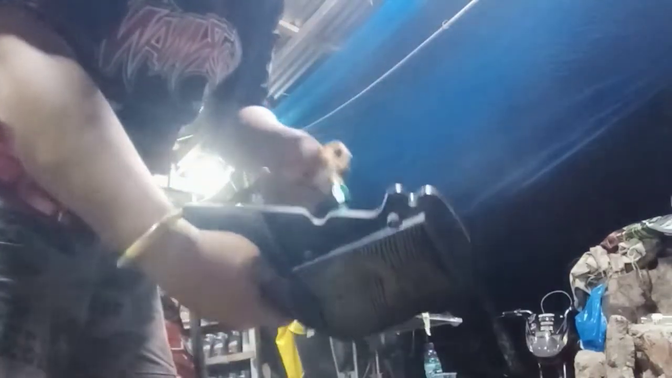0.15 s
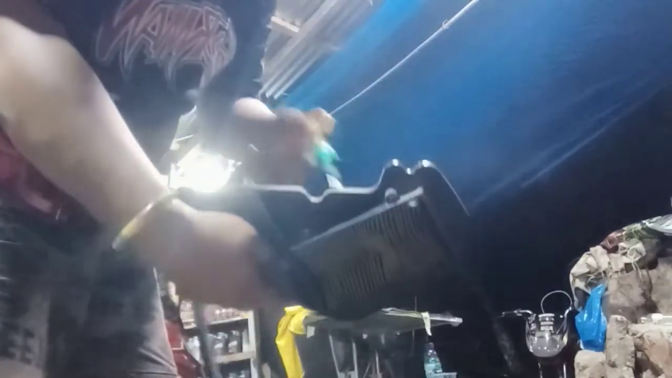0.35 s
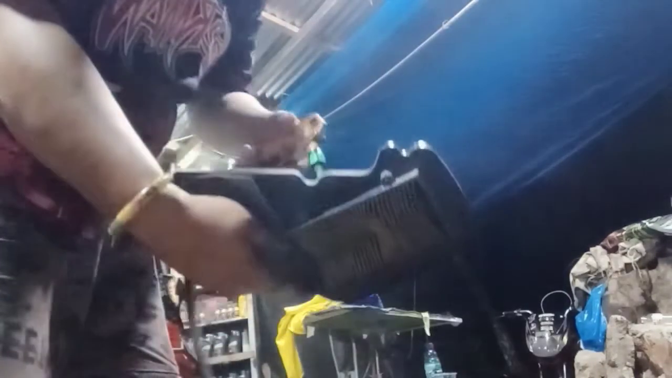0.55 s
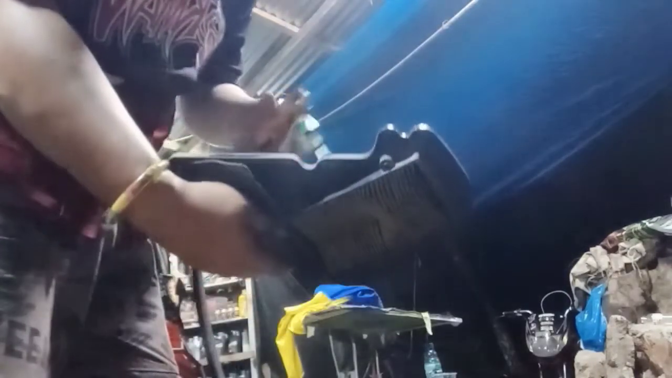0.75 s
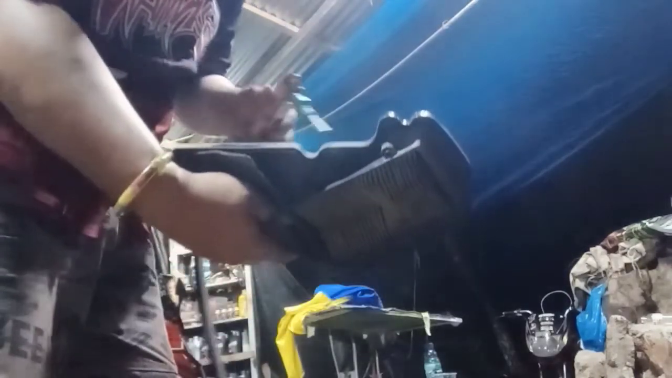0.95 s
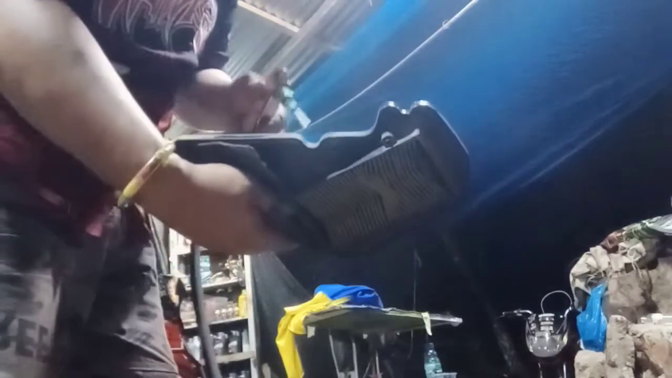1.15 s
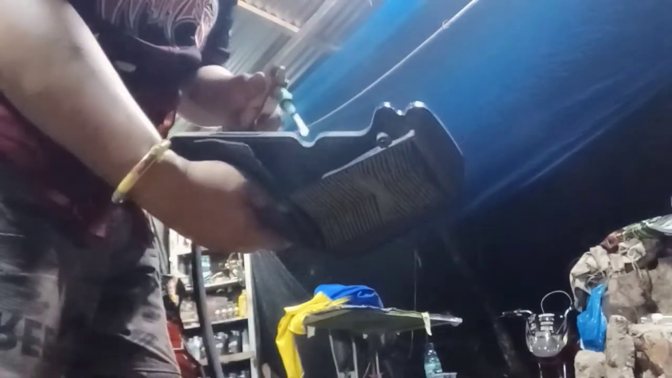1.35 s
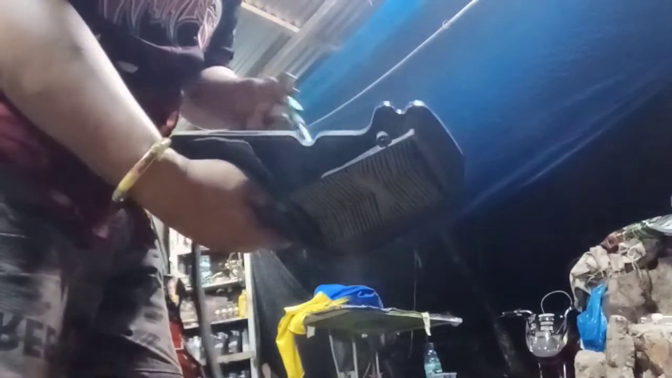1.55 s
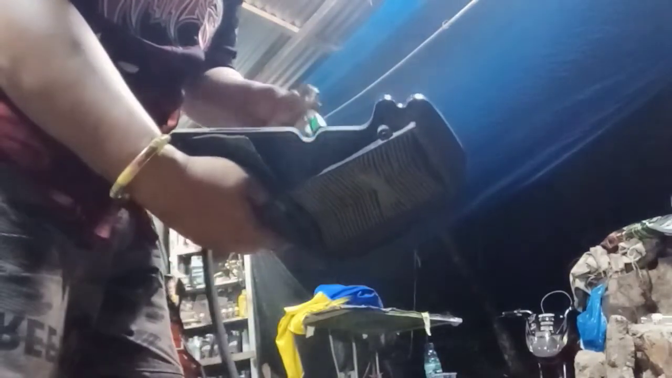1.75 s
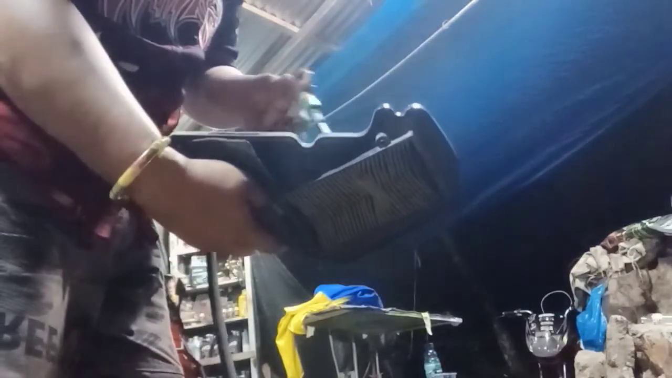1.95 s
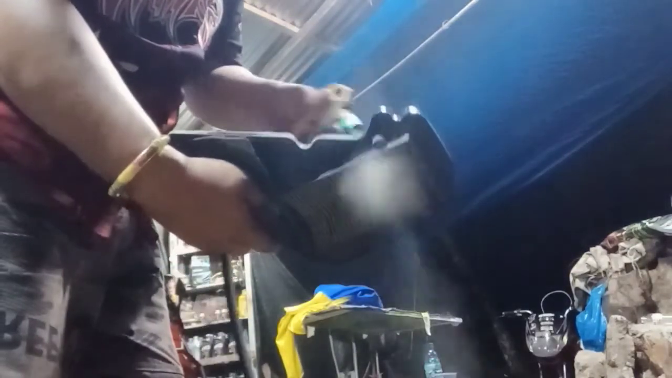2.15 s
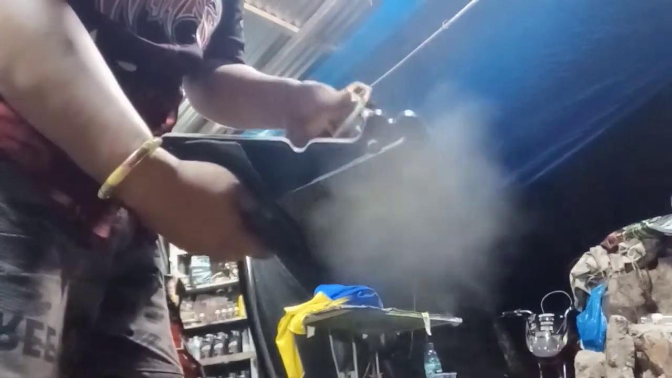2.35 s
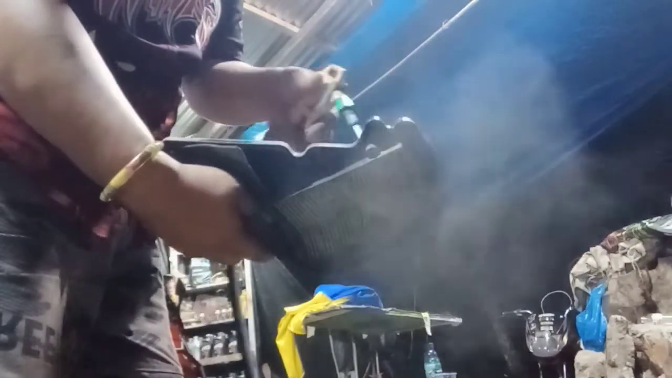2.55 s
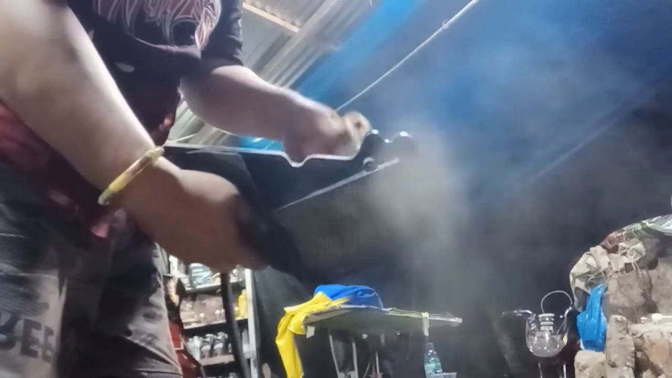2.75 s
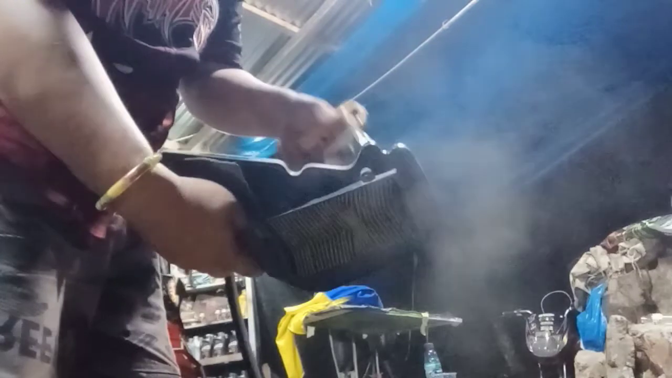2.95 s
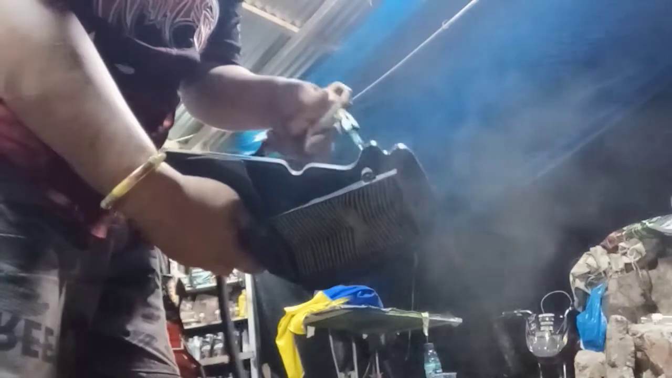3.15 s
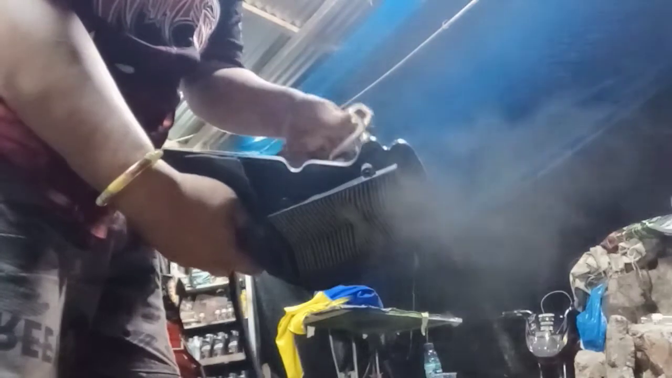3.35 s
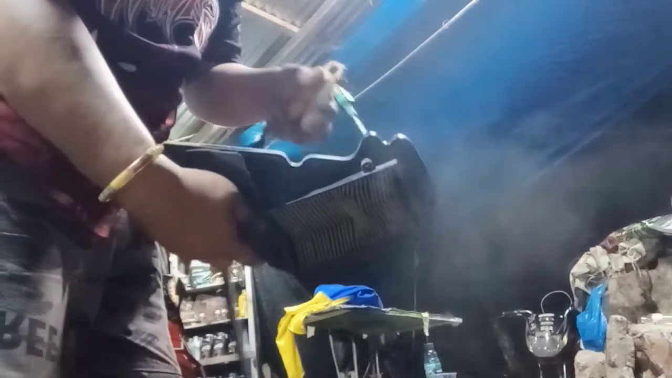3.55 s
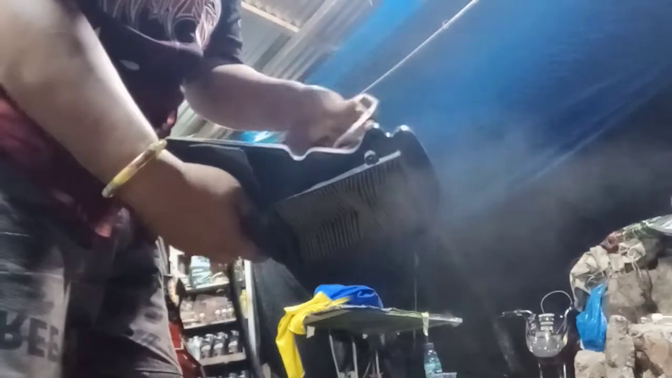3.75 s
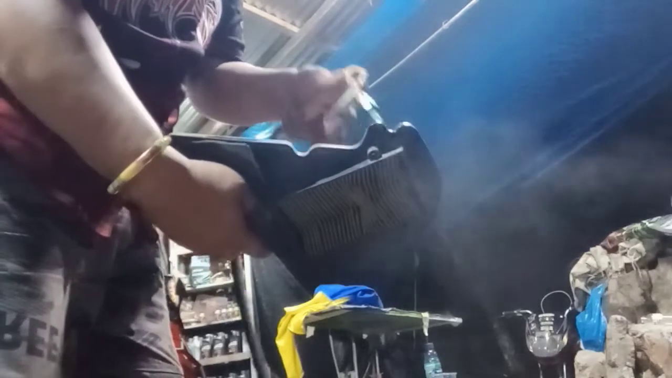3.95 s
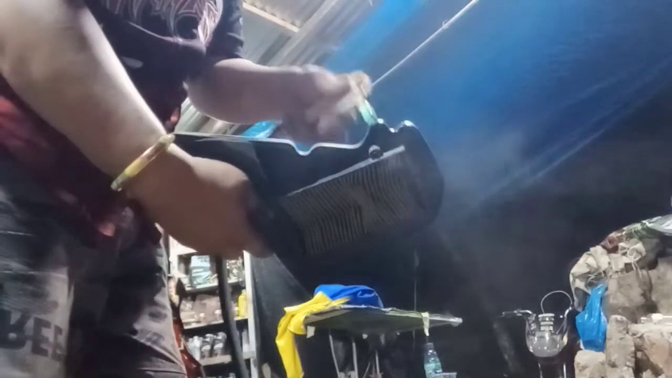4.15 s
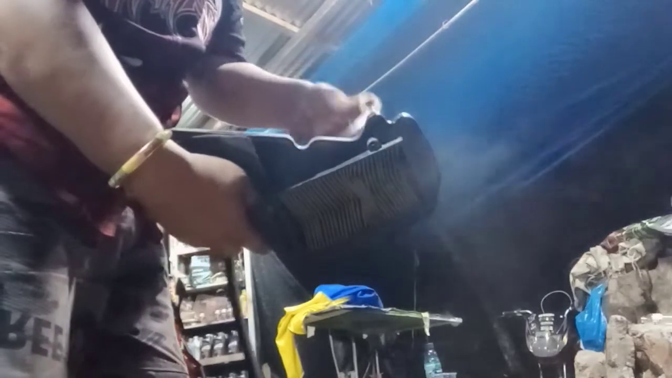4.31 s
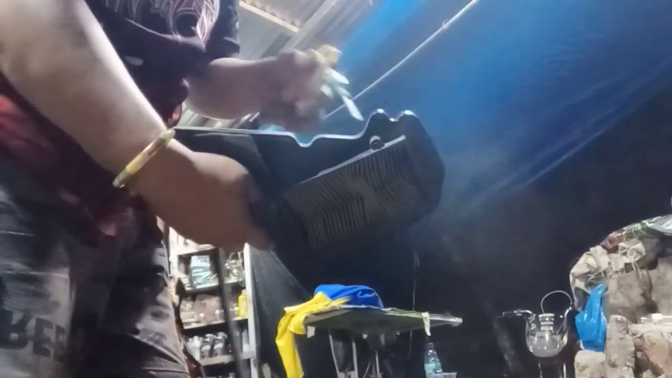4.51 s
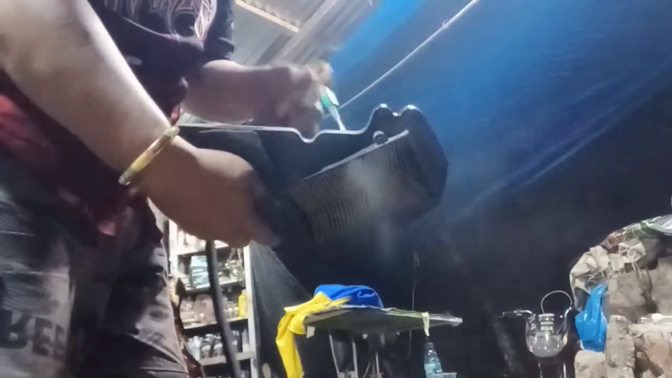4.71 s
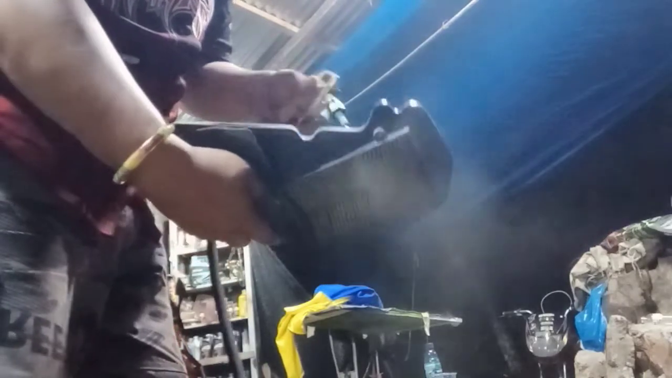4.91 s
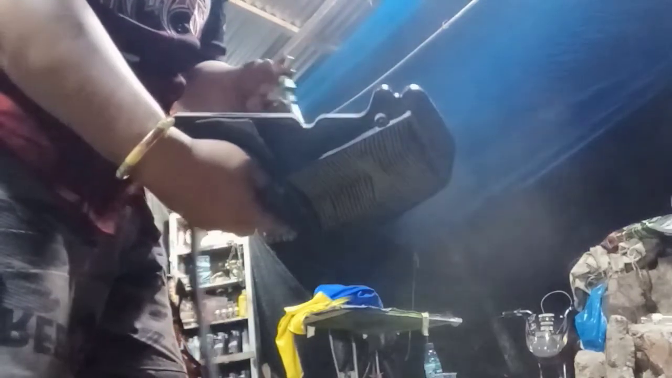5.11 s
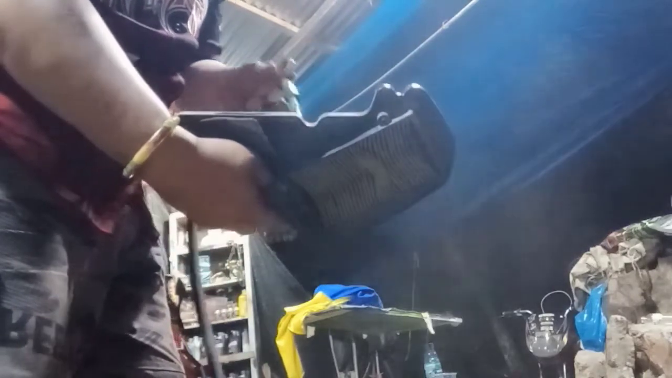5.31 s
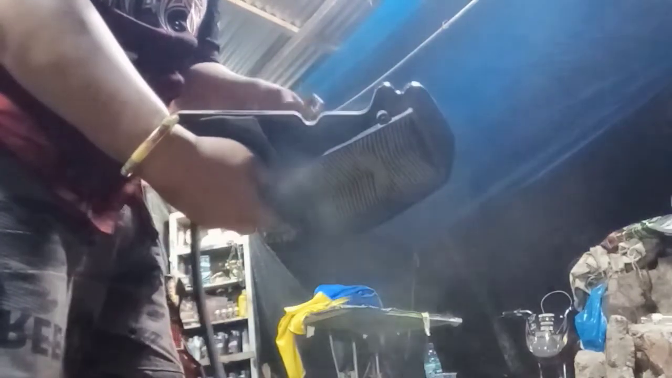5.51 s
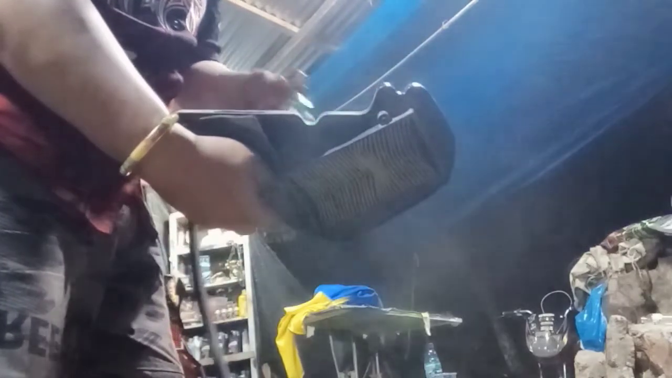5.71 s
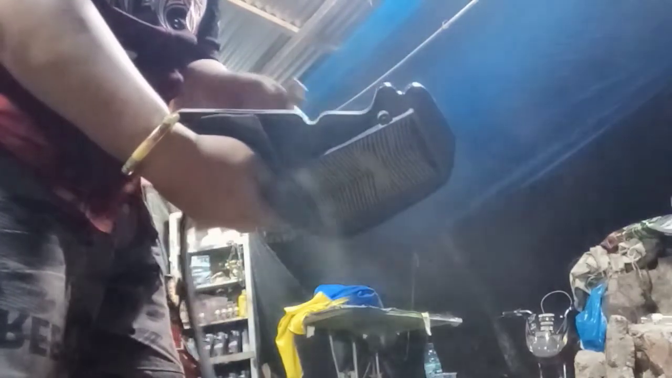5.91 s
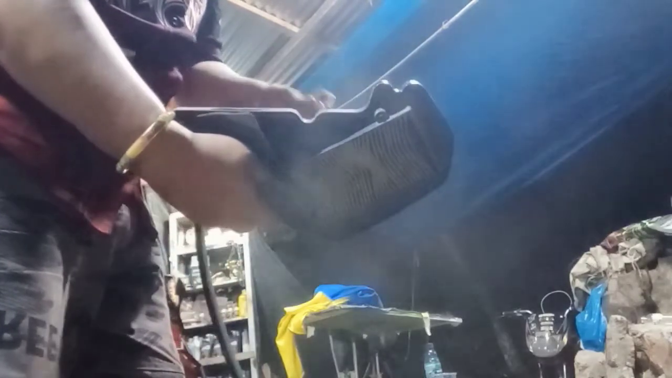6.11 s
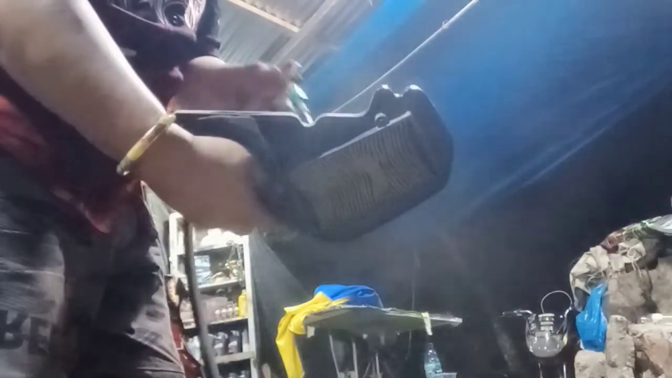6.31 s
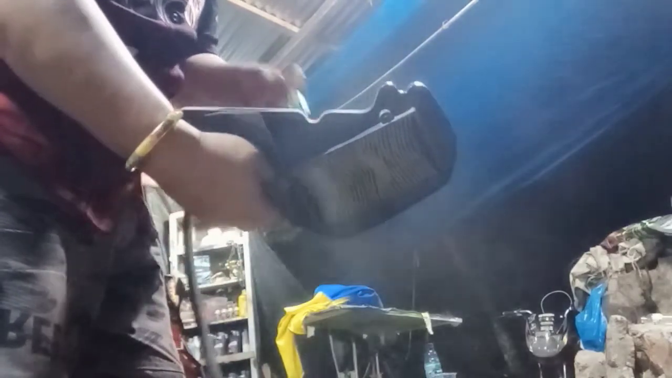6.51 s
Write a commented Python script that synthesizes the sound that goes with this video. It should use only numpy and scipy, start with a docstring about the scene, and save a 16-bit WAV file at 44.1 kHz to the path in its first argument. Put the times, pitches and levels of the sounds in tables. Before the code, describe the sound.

In a workshop, close to a small microphone, compressed air is blown into a pleated filter in a hollow plastic housing. The tail of a faint puff leads into moderate bursts at about 0.03 and 0.37 seconds. Two short plastic clacks follow near 0.7 and 0.8, the second with a dull knock. A barely audible puff comes at 1.0 and a tiny tick at 1.15. From 1.5 strong blasts arrive at 1.5, 2.1, 2.6, 3.1, 3.5, 4.0, 4.7, 5.3, 5.8 and 6.5, with a very brief, sharper spurt at 2.75. Each lasts about a fifth of a second: fast onset, uneven midrange roar, boxy resonance, fluttering pleats, bright hiss, abrupt shutoff and short echo. Low rumble, soft distant noise, faint steady hum and almost hidden thin whistles lie beneath.

```python
"""A blow gun fires short blasts of compressed air into a pleated filter in its plastic housing.
Each blast is flickering noise in six parts: roar on the pleats, boom of the housing, hiss at the edge,
sizzle at the nozzle, flutter of the pleats and wind on the microphone; a workshop answers with an echo.
Underneath lie street rumble, far noise and a motor hum; noise cracks with decaying sines are taps
of the gun on the housing, and narrow noise makes a thin whistle."""
import sys
import numpy as np
from scipy import signal
from scipy.fft import rfft, irfft, next_fast_len
from scipy.io import wavfile
from scipy.ndimage import map_coordinates

SR = 44100
rng = np.random.default_rng(int(sys.argv[2]) if len(sys.argv) > 2 else 0)


def wav_record(signal):
    """Record a signal, one row per channel, as 16-bit PCM in the file named by sys.argv[1]."""
    frames = np.transpose(np.atleast_2d(signal))
    bounded = np.clip(frames, -1, 1)
    # unit amplitude maps onto the largest positive 16-bit level
    quanta = np.round(bounded * 32767).astype(np.int16)
    wavfile.write(sys.argv[1], SR, quanta)


N = 294404

# Blasts of air. Each row: valve opens in seconds, rise in seconds, open time in seconds,
# then mid-blast level in dB and change in dB from start to end for roar, housing, hiss and sizzle in turn,
# then flutter level in dB, wind level in dB, focused band in Hz, its level in dB against the roar.
BLASTS = [(-.05, .01, 0.1, -42, 4, -43, 9, -55, 2, -63, 2, -48, -52, 3150, -6),
          (0.029, 0.031, 0.18, -27, -0.5, -29.5, 5.5, -38, -1, -43, -2, -36, -49, 3100, -4.5),
          (.365, 0.027, 0.17, -23, -22, -26.5, -12.5, -33, -13, -37, -14, -31, -44, 3070, -6.5),
          (1.02, 0.023, .18, -47, -5, -52, 0.1, -69, -4, -82, 0.1, -59, -63, 3330, -14),
          (1.512, 0.027, 0.18, -17, -2.5, -18.5, -0.8, -29, -9.5, -35, -7, -22, -35, 3240, -9.5),
          (2.071, 0.02, 0.16, -18.5, 12.5, -19, 6.5, -28.5, -4.5, -35, -14, -26.5, -37, 2510, -8.5),
          (2.598, .035, 0.15, -21, 4.5, -21, 2.5, -32, -6, -35.5, 3, -28, -37.5, 2260, -8),
          (2.755, 0.011, 0.02, -10.5, -3.5, -19.5, -9, -32.5, 2, -40, 2, -29, -37, 3300, -6),
          (3.088, 0.031, 0.2, -20, 17, -19.5, 7, -31, 9, -37.5, 3, -28, -38.5, 2190, -7),
          (3.542, 0.023, 0.18, -18.5, -2, -17.5, -3.5, -29.5, -14.5, -37, -9, -27, -38, 2490, -5),
          (4.001, 0.062, 0.24, -19.5, 0.8, -20.5, -3, -30.5, -4.5, -37.5, -5, -31, -39, 2180, -7),
          (4.716, 0.027, 0.16, -19, 3, -20.5, 1.5, -26.5, -8.5, -34, -9, -25, -33.5, 3500, -9),
          (5.314, 0.025, 0.18, -18, -2, -18.5, -1.3, -29.5, -7, -37, 5, -26.5, -33, 3650, -7.5),
          (5.836, 0.024, .18, -22, 8, -23, -0.5, -30, -6.5, -34, -8, -27, -36, 3400, -8),
          (6.479, .022, 0.17, -18.5, -1, -22, -5.5, -26.5, -13.5, -32, -5, -25, -31.5, 3570, -7.5)]
# Colours of the six jet parts. Each row: frequency in Hz, relative density in dB per Hz.
ROAR_COLOUR = [(1500, -22.5), (2550, -3.5), (2770, 2.5), (3000, -1), (3250, 3), (3850, -4.5), (4900, -11.5),
               (5250, -18.5), (5500, -25), (7150, -22), (12100, -120)]
HOUSING_COLOUR = [(880, -42), (1500, -22.5), (1610, -3), (1900, -1.5), (2130, 1.5), (2300, 0), (2550, 0.5),
                  (3320, -5), (5610, -120)]
HISS_COLOUR = [(3240, -10), (5500, -10), (5700, -9), (6160, -1), (7430, 3), (7960, 2), (9200, -13),
               (12000, -30.5), (20200, -120)]
SIZZLE_COLOUR = [(8300, -12), (9200, 2), (9800, -5.5), (11200, -1), (12600, -5.5), (13600, 2.5),
                 (15500, -1)]
FLUTTER_COLOUR = [(290, -53), (500, -12.5), (770, -5.5), (947, -7.5), (1060, -6), (1160, -0.5), (1500, -4),
                  (1950, -32), (3300, -120)]
WIND_COLOUR = [(25, -34), (50, -8), (90, 3), (150, 5), (300, 3.5), (500, 2.5), (700, -25)]
# Swells and dips as the jet crosses pleats and ribs. Each row: centre in seconds, half width in seconds,
# roar change in dB, housing change in dB, change of the other four parts in dB.
SWELLS = [(.055, 0.013, -2.5, 2.5, 1.5), (.095, 0.027, -1, -4.5, -1.8), (.165, 0.016, 5.5, -2, -1),
          (.397, 0.015, -1.5, 3, -1), (.455, 0.015, 2, -2, 2), (0.532, 0.012, 11, 0, 3),
          (1.545, .015, 3.5, 1, -1.5), (2.122, 0.007, 2, 5.5, 3), (2.165, 0.017, -3, 3.5, 0),
          (2.204, 0.005, -1, -1, 3), (2.705, .006, 7, 9, 2), (2.717, 0.0045, 6, 3, 2),
          (2.737, 0.0038, 9.5, -6, 5), (2.84, 0.018, 3, 2, 6.5), (3.235, 0.026, -8.5, 3.5, 2),
          (3.281, 0.0041, -2, -11, 4.5), (3.563, 0.011, -2, 5.5, -6), (3.61, 0.024, 3.5, -4, 2),
          (3.709, 0.012, 1, 3.5, 5), (4.17, 0.042, -2.3, 7.5, 5.5), (4.22, 0.017, -2, 1, 2),
          (4.86, .015, -5.5, 2, 3), (5.351, 0.031, 2, 0, 7.5), (5.39, 0.022, -3.5, -4.5, 1.5),
          (5.935, 0.0085, 2.5, 3, 0.1), (5.981, .01, 8, 5.5, 7), (6.545, 0.018, -3.5, -3, -2.5),
          (6.6, 0.029, -1, 5.5, 0.3), (6.641, .008, 11.5, 4, 7.5)]
# Onset of the blast. One value a part, roar, housing, hiss, sizzle, flutter, wind: start level in dB
# under the hold. Sizzle and wind start lowest.
RISE_FROM_DB = [-34, -23.5, -37, -47, -23, -45]
RISE_BEND = 1.54  # above 1, the rise is steepest at first
# Speed of the closing valve. One value a part, in the same order: fall in dB per second.
VALVE_CLOSE_DB_PER_S = [920, 880, 900, 900, 800, 600]
# Air left behind the valve. One value a part, in the same order: level in dB against the hold at closing.
BLEED_DB = [-10.5, -23, -19, -15, -8, -19]
BLEED_DB_PER_S = 175  # this rest then fades
FLUTTER_FOLLOWS, WIND_FOLLOWS = 0.98, 1  # shares of the housing's and the hiss's change
FOCUS_WIDTH_HZ, FOCUS_FADE_DB_PER_S = 450, 400  # width of each of two resonances; fade once the valve shuts
# Narrow air modes of the housing. Each row: frequency in Hz, width in Hz, lift (or cut) in dB.
CAVITY_MODES = [(783, 25, 4.5), (919, 52, 5.5), (1115, 130, -1.5), (1630, 70, 0.5), (2130, 27, 3.5),
                (2810, 16, -5), (2850, 40, -5.5), (3218, 34, -0.5), (3130, 21, -0.5), (3865, 42, 5.5),
                (4020, 99, 1.5), (4730, 22, 1.5), (6970, 77, -21), (6520, 95, -22), (7650, 160, -6.5),
                (8150, 70, -17.5), (10200, 160, 4), (11400, 170, 4), (13700, 140, 6), (13850, 320, -19)]
WALL_DELAY_S, WALL_SWING_S, WALL_SHARE = 0.0024, 0.000484, 0.19
# Diffuse workshop echo. Each row: frequency in Hz, t60 in seconds, level in dB against the direct sound.
SHOP_ECHO = [(200, 0.91, -15.5), (1000, 0.33, -13), (3100, 0.51, -11), (7050, 0.42, -5),
             (11000, 0.3, -13.5), (15000, 0.36, -6)]
# Swell of the rumble. Each row: time in seconds, level in dB.
RUMBLE_LEVEL = [(0.0, -43), (1.3, -44), (2.5, -47.5), (4.0, -44.5), (4.9, -41), (5.5, -43.5), (6.67, -43)]
# Colours of the rumble and of the far noise. Each row: frequency in Hz, relative density in dB per Hz.
RUMBLE_COLOUR = [(20, -22), (45, -27), (63, -4.5), (81, -2.5), (130, -0.5), (167, -4), (198, -5.5),
                 (288, -9), (389, -12), (450, -9.5), (580, -72)]
FAR_COLOUR = [(240, -39), (400, -14.5), (580, -1.5), (900, -2), (1300, -5), (1600, -9.5), (2500, -9.5),
              (3640, -11), (4500, -19.5), (5600, -36.5), (6600, -27), (8300, -34), (8900, -38.5),
              (15500, -43)]
# Bands that stand out of the far noise. Each row: frequency in Hz, width in Hz, lift in dB.
FAR_BANDS = [(7230, 330, 7), (8150, 120, 6)]
FAR_DB = -46  # before the bands are lifted
HUM_HZ, HUM_DB = 480.8, -53  # centre pitch and mean level
# Taps of the gun on the housing. Each row: time in seconds, level in dB, brightness in dB per octave,
# top of the crack in Hz, metal ring in dB, knock in dB, the last two against the tap's level.
TAPS = [(.6886, -22, 3, 8500, -24, -40), (.8027, -19.5, 5.5, 16000, -45, -12),
        (1.1474, -42, 12, 16000, -45, -40)]
# Ringing modes of the metal gun. Each row: frequency in Hz, level in dB against the ring, t60 in seconds.
GUN_MODES = [(5640, -8, .1), (6630, -8, .12), (7110, -5, .08), (7850, 0, .09)]
# Thin whistle. Each row: start in seconds, length in seconds, pitch in Hz, level in dB.
WHISTLES = [(1.3, .22, 6740, -69), (2.83, .22, 6710, -69), (4.36, .33, 6925, -69)]
WHISTLE_HALF_WIDTH_HZ, WHISTLE_FADE_DB_PER_S = 55, 170
MIC_LOW_HZ, CUTOFF_HZ = 44.7, 15500


def from_db(db):
    """Decibels to gain."""
    return 10 ** (np.asarray(db) / 20)


def rms_one(x):
    """Scale to rms 1."""
    return x / np.sqrt(np.mean(x ** 2) + 1e-20)


def at_hz(points, hz, column=1):
    """Read a table column on a log-frequency axis."""
    table = np.array(points)
    return np.interp(np.log(hz), np.log(table[:, 0]), table[:, column])


def drift(rate_hz):
    """Slow random wander of rms 1: noise at every 40th sample through a double one-pole low-pass."""
    step = 40
    pole = np.exp(-2 * np.pi * rate_hz * step / SR)
    noise = rng.standard_normal(N // step + 2002)
    # the first 2000 points let the filter settle
    slow = signal.lfilter([1], [1, -2 * pole, pole * pole], noise)[2000:]
    return np.interp(np.arange(N) / step, np.arange(len(slow)), rms_one(slow))


def resonance(x, hz, width_hz):
    """Two-pole resonance, gain 1 on top."""
    r = np.exp(-np.pi * width_hz / SR)
    feedforward = (1 - r * r) / 2 * np.array([1, 0, -1])
    feedback = [1, -2 * r * np.cos(2 * np.pi * hz / SR), r * r]
    return signal.lfilter(feedforward, feedback, x)


def lift(x, modes):
    """Raise or cut narrow bands by adding or subtracting their resonances."""
    for hz, width_hz, db in modes:
        x = x + (from_db(db) - 1) * resonance(x, hz, width_hz)
    return x


def turbulence(colour, patchy_db, rate_hz, count):
    """Noise of a given colour in overlapping bands that flicker each on its own; rms 1."""
    size = next_fast_len(N)
    hz = np.maximum(np.arange(size // 2 + 1) * SR / size, 1)
    coloured = rfft(rng.standard_normal(size)) * from_db(at_hz(colour, hz))
    ends_hz = [colour[0][0], colour[-1][0]]
    place = np.interp(np.log(hz), np.log(ends_hz), [0, count - 1])
    total = np.zeros(N)
    for k in range(count):
        triangle = np.clip(1 - abs(place - k), 0, 1)
        band = irfft(coloured * triangle, size)[:N]
        total += band * from_db(patchy_db * drift(rate_hz))
    return rms_one(total)


def swells():
    """Jet crossing pleats and ribs: one bell-shaped level change in dB a swell, for the six parts."""
    out = np.zeros((6, N))
    for centre, width, roar_db, housing_db, rest_db in SWELLS:
        first = max(round((centre - 3 * width) * SR), 0)
        last = min(round((centre + 3 * width) * SR), N)
        at = np.arange(first, last)
        bell = np.exp(-((at / SR - centre) / width) ** 2)
        out[:, at] += np.outer([roar_db, housing_db] + 4 * [rest_db], bell)
    return out


def blast_levels():
    """Valve gains of the six parts: rise, sloping hold, snap shut and bleed-off, with swells on top."""
    t, gains = np.arange(N) / SR, np.zeros((6, N))
    swell_db = swells()
    for start, rise, length, *pairs, flutter_db, wind_db, _, _ in BLASTS:
        span = slice(max(round(start * SR), 0), round((start + length + 0.35) * SR))
        age = t[span] - start
        mid_db = [*pairs[::2], flutter_db, wind_db]
        change_db = [*pairs[1::2], FLUTTER_FOLLOWS * pairs[3], WIND_FOLLOWS * pairs[5]]
        slope = np.clip(age / length, 0, 1) - 0.5
        hold_db = np.outer(change_db, slope) + np.c_[mid_db]
        rise_db = np.outer(RISE_FROM_DB, np.clip(1 - age / rise, 0, 1) ** RISE_BEND)
        since_shut = np.maximum(age - length, 0)
        snap = from_db(-np.outer(VALVE_CLOSE_DB_PER_S, since_shut))
        bleed = from_db(np.c_[BLEED_DB] - BLEED_DB_PER_S * since_shut)
        closing = np.maximum(snap, bleed)
        gains[:, span] += closing * from_db(hold_db + rise_db + swell_db[:, span])
    return gains


def focused_roar():
    """The pocket of air that the nozzle points into gathers some roar in one band, new for each blast."""
    out, white = np.zeros(N), rng.standard_normal(N)
    starts = [max(round(row[0] * SR), 0) for row in BLASTS] + [N]
    for first, last, (start, _, length, *_, hz, db) in zip(starts, starts[1:], BLASTS):
        once = resonance(white[first:last], hz, FOCUS_WIDTH_HZ)
        band = resonance(once, hz, FOCUS_WIDTH_HZ)
        since_shut = np.maximum(np.arange(first, last) / SR - start - length, 0)
        out[first:last] = from_db(db - FOCUS_FADE_DB_PER_S * since_shut) * rms_one(band)
    return out


def housing(x):
    """Air modes shape narrow bands; a wall echo, moving with the nozzle, combs the noise."""
    x = lift(x, CAVITY_MODES)
    lag = (WALL_DELAY_S + WALL_SWING_S * drift(1.436)) * SR
    echo = map_coordinates(x, [np.arange(N) - lag], order=3)
    return (x + WALL_SHARE * echo) / np.sqrt(1 + WALL_SHARE ** 2)


def jet():
    """Turbulent air: eddies make all parts flutter together and the bands a little alone."""
    parts = [turbulence(ROAR_COLOUR, patchy_db=1.38, rate_hz=16.0, count=6) + focused_roar(),
             turbulence(HOUSING_COLOUR, patchy_db=-0.3, rate_hz=23.0, count=3),
             turbulence(HISS_COLOUR, patchy_db=4.0, rate_hz=6.7, count=6),
             turbulence(SIZZLE_COLOUR, patchy_db=1.5, rate_hz=11.0, count=5),
             turbulence(FLUTTER_COLOUR, patchy_db=-3.2, rate_hz=25.0, count=4),
             turbulence(WIND_COLOUR, patchy_db=0.0, rate_hz=3.5, count=3)]
    blasts = np.sum(blast_levels() * parts, axis=0)
    common_flutter = from_db(0.95 * drift(30.0))
    return housing(common_flutter * blasts)


def workshop_echo(x):
    """Diffuse echo: noise that fades in over 3.2 ms and dies away band by band."""
    t, echo = np.arange(SR) / SR, np.zeros(SR)
    edges = np.geomspace(60, 17000, 15)
    for low, high in zip(edges, edges[1:]):
        band_filter = signal.butter(2, [low, high], "band", fs=SR, output="sos")
        band = signal.sosfilt(band_filter, rng.standard_normal(SR))
        hz = np.sqrt(low * high)
        t60 = at_hz(SHOP_ECHO, hz)
        energy = t60 * SR / (2 * np.log(1000))  # summed power of the decay
        decay = from_db(at_hz(SHOP_ECHO, hz, column=2) - 60 * t / t60)
        echo += band * decay / np.sqrt(energy)
    return signal.fftconvolve(x, echo * np.clip(t / 0.0032, 0, 1))[:N]


def street_rumble():
    """Lumpy low noise that slowly swells and sinks."""
    s, level_db = np.transpose(RUMBLE_LEVEL)
    level = from_db(np.interp(np.arange(N) / SR, s, level_db))
    return level * turbulence(RUMBLE_COLOUR, patchy_db=0.5, rate_hz=2.1, count=5)


def far_noise():
    """Broad, gently flickering noise with two narrow bands standing out."""
    noise = turbulence(FAR_COLOUR, patchy_db=0.44, rate_hz=1.0, count=7)
    return from_db(FAR_DB) * lift(noise, FAR_BANDS)


def motor_hum():
    """A sine whose level and phase wander slightly."""
    level = np.sqrt(2) * from_db(HUM_DB + 0.29 * drift(1.0))  # sine peak for this rms
    phase = 2 * np.pi * HUM_HZ * np.arange(N) / SR + 1.5 * drift(1.0)
    return level * np.sin(phase)


def taps():
    """A short crack of plastic, a dull knock of the housing and the ring of the metal gun."""
    out, t = np.zeros(N), np.arange(round(0.3 * SR)) / SR
    hz = np.maximum(np.fft.rfftfreq(len(t), 1 / SR), 1200)  # colour stays flat below 1200 Hz
    for s, level_db, tilt_db, top_hz, ring_db, knock_db in TAPS:
        bright = from_db(at_hz(FAR_COLOUR, hz) + tilt_db * np.log2(hz / 3000))
        colour = bright / (1 + (hz / top_hz) ** 10)
        noise = irfft(rfft(rng.standard_normal(len(t))) * colour, len(t))
        crack = rms_one(noise) * np.exp(-t / 0.0035) / 2
        knock = from_db(knock_db) * np.sin(2 * np.pi * 270 * t) * np.exp(-t / 0.011)
        ring = np.zeros(len(t))
        for mode_hz, db, t60 in GUN_MODES:
            ring += from_db(ring_db + db - 60 * t / t60) * np.sin(2 * np.pi * mode_hz * t)
        attack = np.minimum(t / 0.0004, 1)
        at = round(s * SR)
        out[at:at + len(t)] += from_db(level_db) * (crack + knock + ring) * attack
    return out


def whistle():
    """A narrow band of noise, shifted up to a pitch of its own each time, that fades in and out."""
    t, out = np.arange(N) / SR, np.zeros(N)
    low_pass = signal.butter(2, WHISTLE_HALF_WIDTH_HZ, fs=SR, output="sos")
    slow = signal.sosfilt(low_pass, rng.standard_normal((2, N)))
    for start, length, hz, db in WHISTLES:
        turn = 2 * np.pi * hz * t
        tone = rms_one(slow[0] * np.cos(turn) + slow[1] * np.sin(turn))
        outside = np.maximum(abs(t - start - length / 2) - length / 2, 0)  # seconds from the held part
        out += from_db(db - WHISTLE_FADE_DB_PER_S * outside) * tone
    return out


def scene():
    """Gun and filter close by, their echo, and the background."""
    near = jet() + taps()
    background = street_rumble() + far_noise() + motor_hum() + whistle()
    return (near + workshop_echo(near) + background)[None]


def record(dry):
    """The small microphone drops the deepest bass, peaks are rounded, the top is cut."""
    bass_cut = signal.butter(2, MIC_LOW_HZ, "high", fs=SR, output="sos")
    thin = signal.sosfilt(bass_cut, dry)
    rounded = 1.3 * np.tanh(thin / 1.3)
    top_cut = signal.ellip(14, 0.5, 75, CUTOFF_HZ, fs=SR, output="sos")
    return signal.sosfilt(top_cut, rounded)


dry = scene()
out = record(dry)
wav_record(out)
```